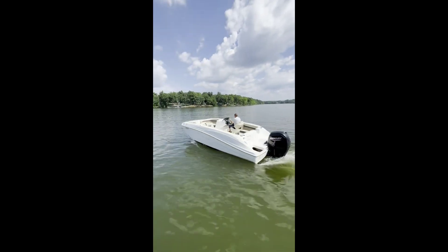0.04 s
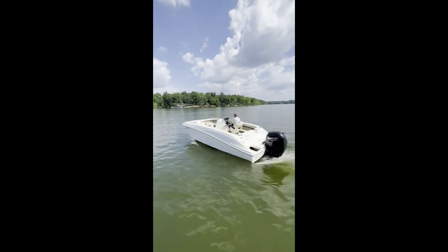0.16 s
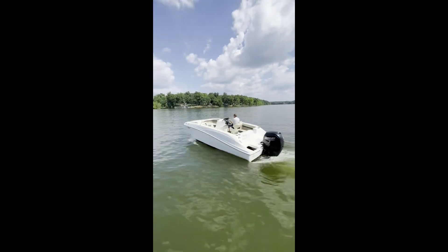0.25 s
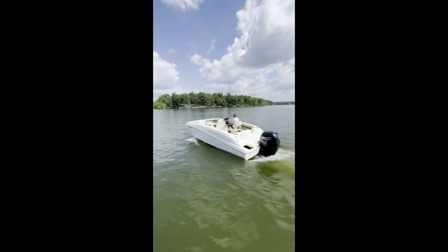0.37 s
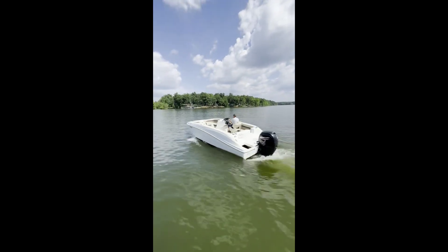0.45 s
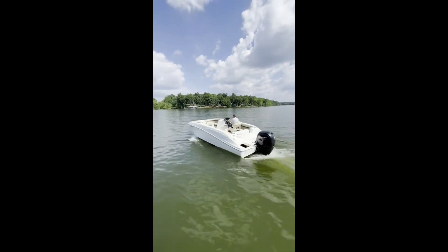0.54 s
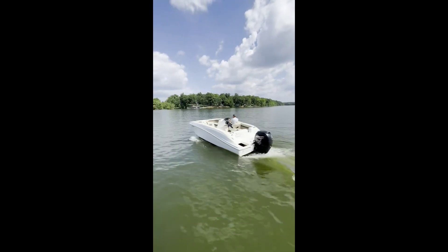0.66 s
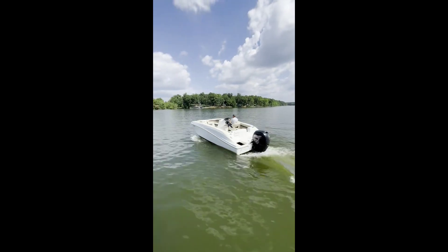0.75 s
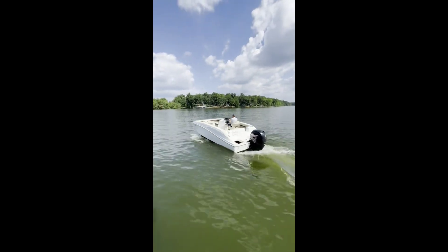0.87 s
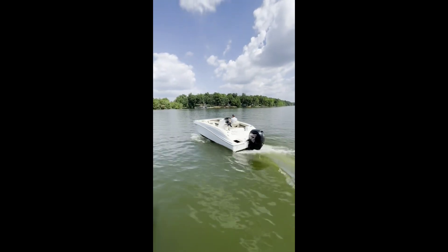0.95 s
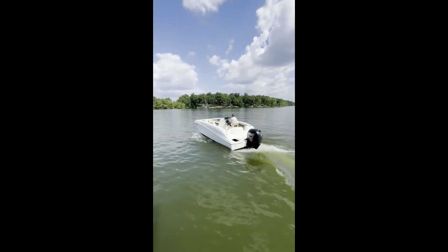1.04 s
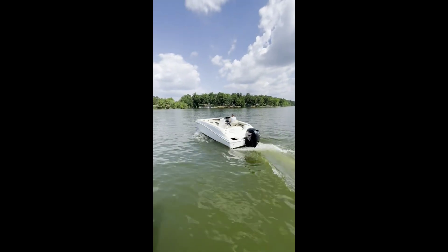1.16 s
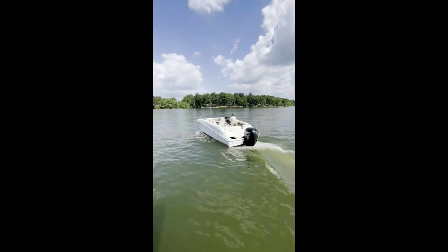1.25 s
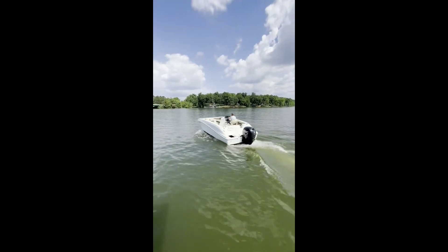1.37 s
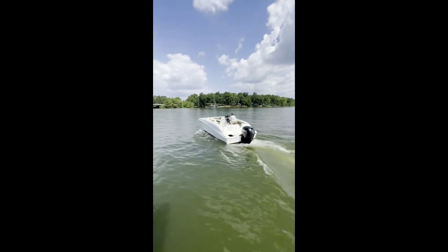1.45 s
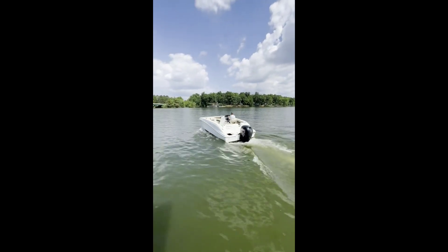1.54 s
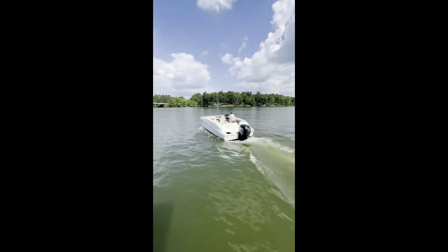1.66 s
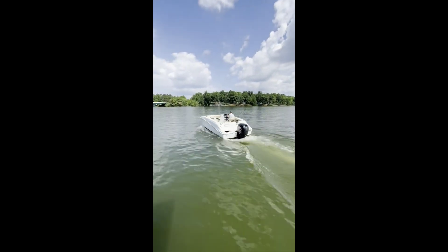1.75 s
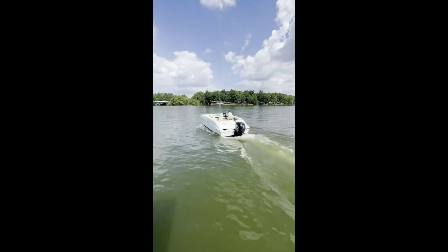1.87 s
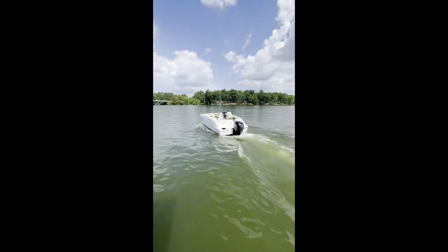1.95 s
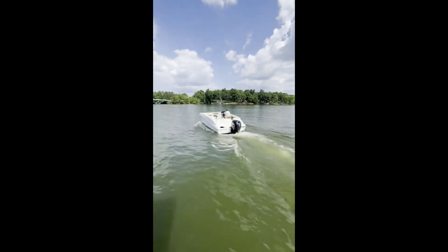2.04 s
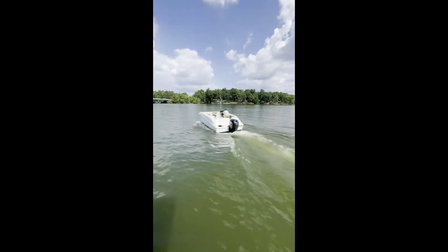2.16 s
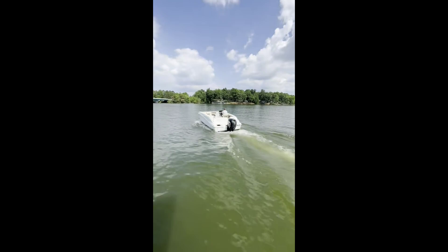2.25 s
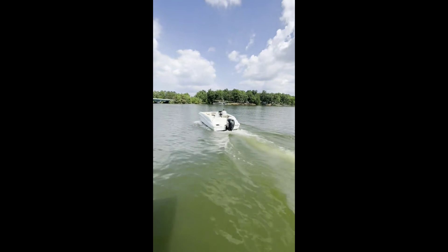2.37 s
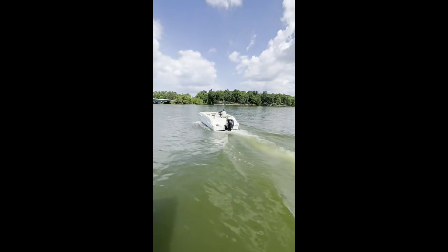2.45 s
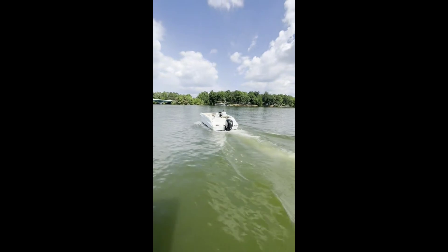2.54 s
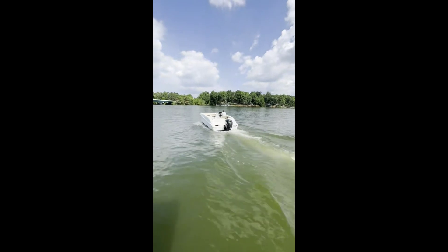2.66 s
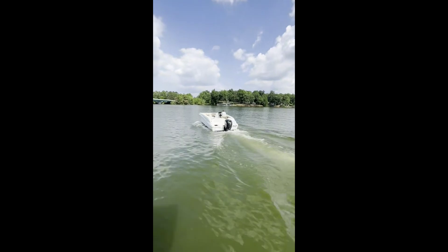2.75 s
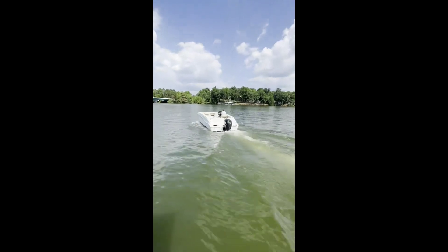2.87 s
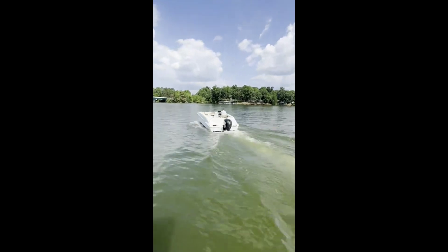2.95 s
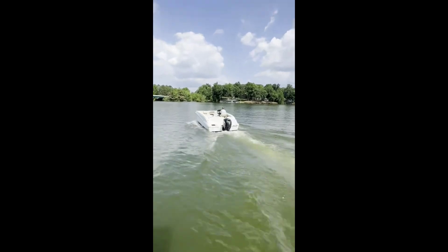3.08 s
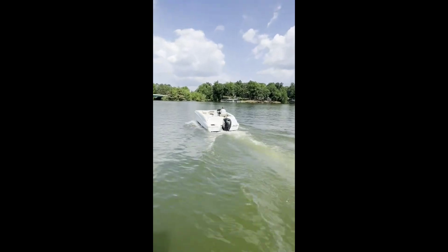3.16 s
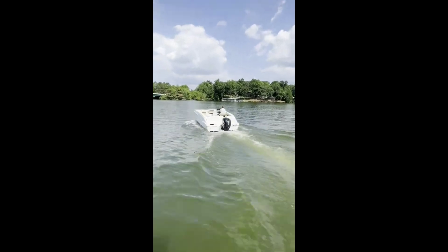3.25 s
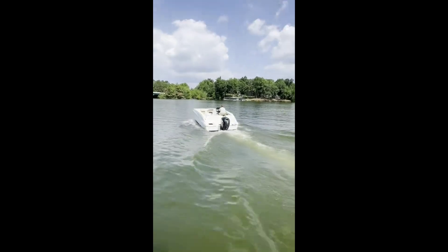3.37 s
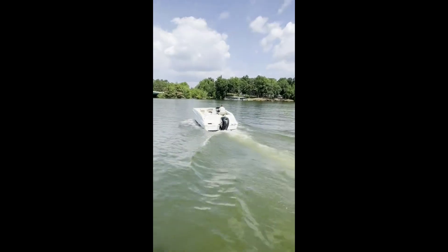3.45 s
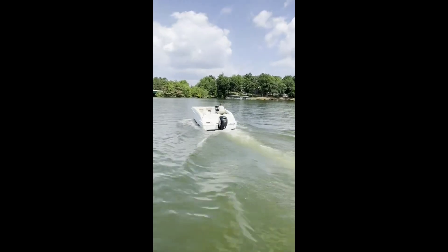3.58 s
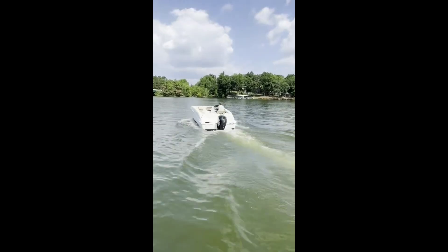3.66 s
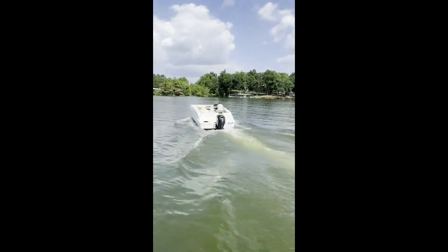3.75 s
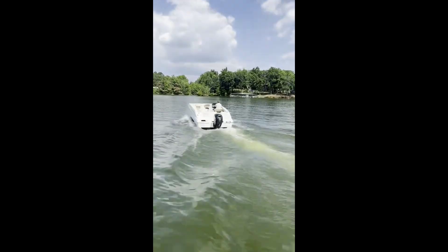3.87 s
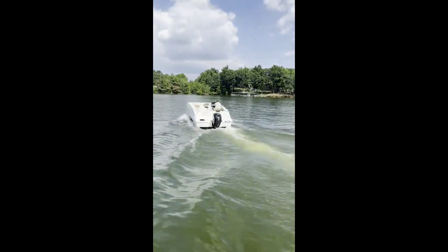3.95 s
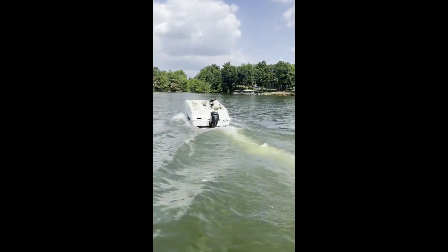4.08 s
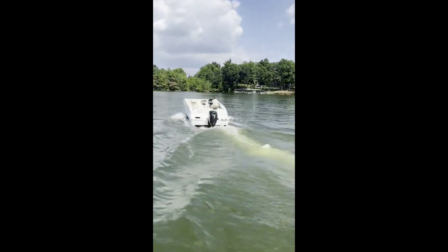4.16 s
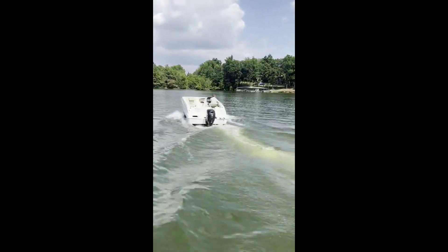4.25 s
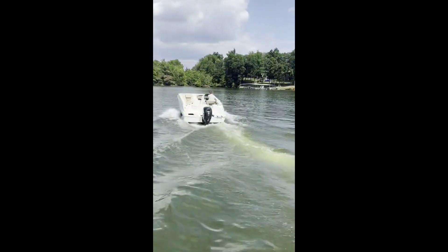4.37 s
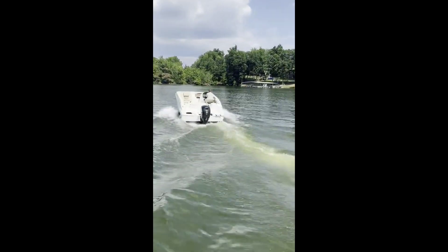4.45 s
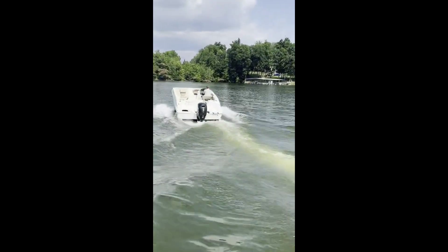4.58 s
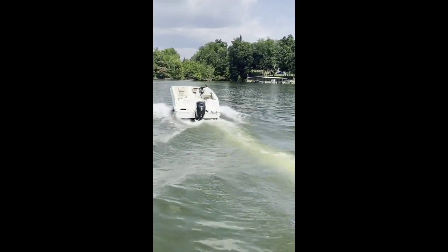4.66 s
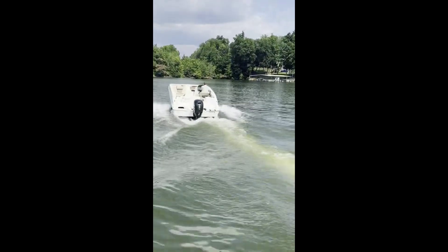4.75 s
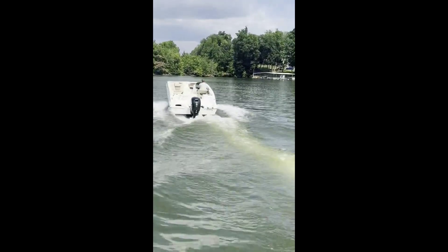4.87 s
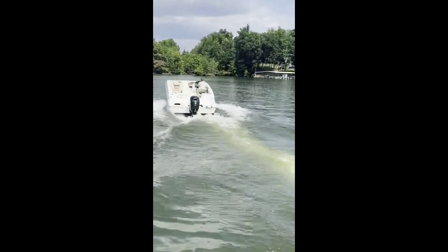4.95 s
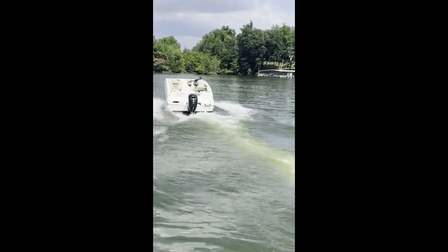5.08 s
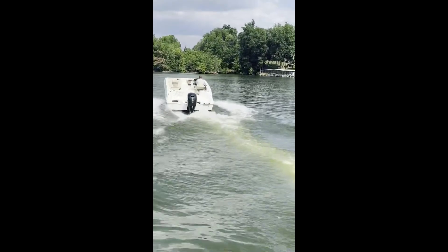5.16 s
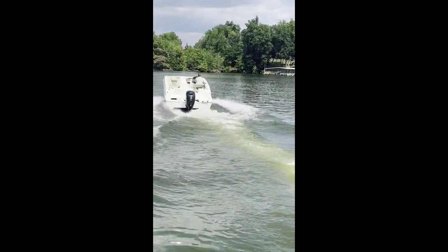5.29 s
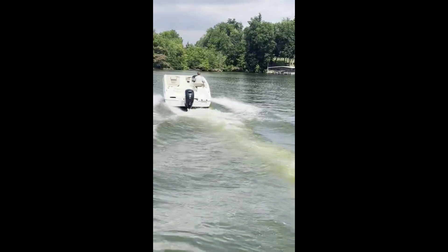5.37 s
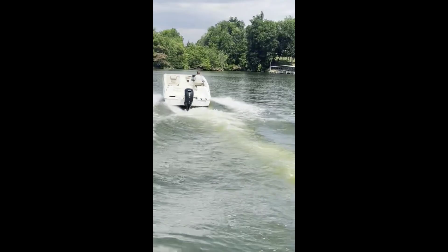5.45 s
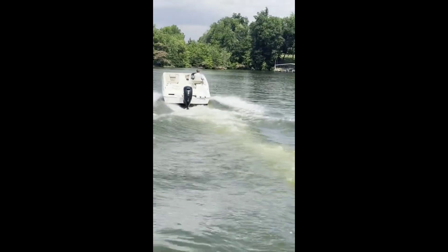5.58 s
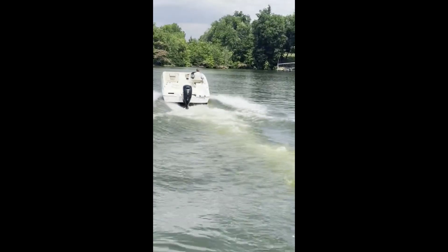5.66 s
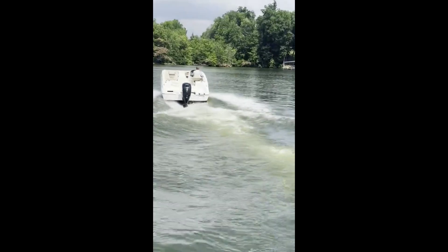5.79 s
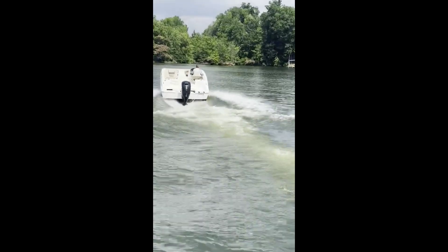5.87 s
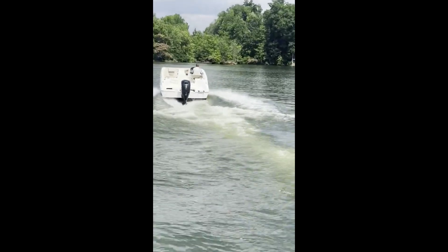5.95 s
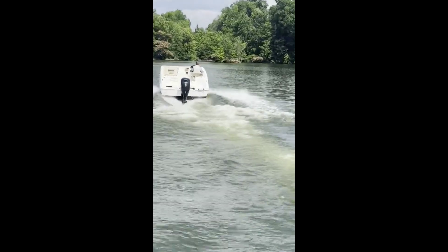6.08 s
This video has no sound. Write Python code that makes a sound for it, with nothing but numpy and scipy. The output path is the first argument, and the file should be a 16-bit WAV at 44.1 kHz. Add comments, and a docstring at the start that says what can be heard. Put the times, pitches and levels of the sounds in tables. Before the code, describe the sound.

On board a motor boat on a lake, the engine hums low, its exhaust burbling through churning water, while an outboard ahead drones with a faint whine. A few dry ticks sound close on the left. About halfway, the near engine opens up hard with a hoarse surge, then holds a higher, slowly climbing note. The two engines throb against each other over hissing spray.

```python
"""A motor boat's four-cylinder engine, heard on board, cruises and then opens up hard at about 3 s.
Its periodic firing gives harmonics that swell and dip as the revs climb, and pulses the gas that
burbles out through the water. An outboard ahead pulls away, slowly gaining speed, and the two
engine notes beat. Bubbles and drops churn and spray along the hulls on the lake, and the stereo
image narrows as the microphone zooms in."""
import sys
import numpy as np
from scipy import signal
from scipy.fft import rfft, irfft, next_fast_len
from scipy.io import wavfile

SR = 44100
rng = np.random.default_rng(int(sys.argv[2]) if len(sys.argv) > 2 else 0)


def master_out(mix):
    """Clip the mix to full scale and print it as 16-bit PCM to the path in sys.argv[1]."""
    frames = np.transpose(np.atleast_2d(mix))
    ceiling = np.clip(frames, -1, 1)
    pcm = np.round(ceiling * 32767).astype(np.int16)
    wavfile.write(sys.argv[1], SR, pcm)


N = 269892
TIME = np.arange(N) / SR
THROTTLE_S = 2.995   # the throttle opens
BITE_S, BITE_LENGTH_S = 3.28, .24   # the propeller bites
# cowling resonances: (frequency [Hz], width [Hz], gain [dB])
COWL_MODES = [(685.5, 56, 5.5), (783, 59, 6.5)]
COWL_HZ = COWL_MODES[0][0]


def from_db(db):
    return 10 ** (np.asarray(db) / 20)


def unit_rms(x):
    return x / np.sqrt(np.mean(x ** 2) + 1e-20)


def ramp(start_s, length_s):
    return np.clip((TIME - start_s) / length_s, 0, 1)


def bell(x, centre, width):
    return np.exp(-((x - centre) / width) ** 2)


def band(x, low, high):
    return signal.sosfilt(signal.butter(2, [low, high], "band", fs=SR, output="sos"), x)


def stereo(mid, side):
    return np.array([mid + side, mid - side])


def phase_of(hz):
    """Phase in radians is the time integral of angular frequency."""
    return 2 * np.pi * np.cumsum(hz) / SR


def in_time(rows):
    """Linear interpolation of each column at every sample."""
    times, *columns = np.transpose(rows)
    return [np.interp(TIME, times, column) for column in columns]


def at_hz(rows, hz):
    """Interpolation of each column over log frequency."""
    points, *columns = np.transpose(rows)
    return [np.interp(np.log(hz), np.log(points), column) for column in columns]


def drift(bandwidth_hz):
    """Low-passed noise: a slow random fluctuation of rms 1."""
    hop, settle = 40, 2000
    pole = np.exp(-2 * hop * np.pi * bandwidth_hz / SR)
    white = rng.standard_normal(N // hop + settle + 2)
    slow = signal.lfilter([1], [1, -2 * pole, pole * pole], white)[settle:]
    return np.interp(np.arange(N) / hop, np.arange(len(slow)), unit_rms(slow))


def coloured_noise(spectrum):
    """Third-octave noise bands weighted by a spectral density; rms 1."""
    low, high = spectrum[0][0], spectrum[-1][0]
    edges = np.geomspace(low, high, round(3 * np.log2(high / low)) + 1)
    white = rng.standard_normal((2, N))
    return unit_rms(sum(from_db(at_hz(spectrum, np.sqrt(a * b))[0]) * band(white[k % 2], a, b)
                        for k, (a, b) in enumerate(zip(edges, edges[1:]))))


def narrow_noise(hz, width_hz):
    """A resonance driven by noise gives a tone of random amplitude and phase; rms 1."""
    phase = phase_of(hz * np.ones(N))
    return unit_rms(drift(width_hz) * np.cos(phase) + drift(width_hz) * np.sin(phase))


def port_wind(level_db=-49):
    """Turbulent wind pressure rumbles independently on each microphone port."""
    return from_db(level_db) * np.array([unit_rms(band(rng.standard_normal(N), 25, 140))
                                         for port in range(2)])


def droplets(per_s, size_spread_db):
    """Shot noise: bubbles and drops of uneven size burst at random over a smooth hiss; rms 1."""
    sizes = from_db(size_spread_db * np.minimum(rng.exponential(1, N), 5)) * rng.choice([-1, 1], N)
    impulses = unit_rms(sizes * (rng.random(N) < per_s / SR))
    return unit_rms(impulses + 1.09 * rng.standard_normal(N))


def froth(level_db=-48.5, loss_db_per_s=2.0, band_hz=(5550, 6380)):
    """The finest bubbles resonate in a narrow high band, fading as the outboard leaves."""
    sizzle = unit_rms(band(droplets(per_s=2500, size_spread_db=5.0), *band_hz))
    return from_db(level_db - loss_db_per_s * TIME) * sizzle


def wake_trough(zoom, level_db=-47):
    """Tumbling water excites a hollow resonance of the wake, lost as the microphone zooms in."""
    return from_db(level_db) * (1 - zoom) * narrow_noise(1320, width_hz=72)


def side_wave(zoom, level_db=-32, start_below_db=14, build_s=0.43, lag_s=0.000544, right_db=-8.5):
    """Time and level differences place a building wave on the left; the zoom shuts it out."""
    # wave peeling off the hull: (frequency [Hz], relative density [dB])
    spectrum = [(350, 4), (480, 2), (680, 7.5), (1000, -4), (1450, -11.5), (2500, -11.5), (4500, -16),
                (6500, -28)]
    envelope = from_db(level_db - start_below_db * np.exp(-TIME / build_s)) * np.sqrt(1 - zoom)
    left = envelope * coloured_noise(spectrum)
    right = from_db(right_db) * np.interp(TIME - lag_s, TIME, left)
    return np.array([left, right])


def water(load, strain, zoom, patchy_db=1.42, air_db_per_octave=-8.0):
    """Shot noise of bubbles and drops: close propeller wash gives way to spray at speed."""
    # water noise: (frequency [Hz], relative wash density [dB], relative spray density [dB],
    # side re mid when wide [dB], side re mid when zoomed [dB])
    spectrum = [(398, -5, -2, -3, -12), (483, -2.5, -5, -13.5, -12), (622, 0.5, -2, -25, -29),
                (956, -7.5, -10.5, -5, 0), (1210, -9.5, -8, -12, -40), (1980, -11, -13.5, -6.5, -54),
                (2550, -17, -16.5, 2.5, -58), (3420, -19, -20, -2, -42), (4720, -23.5, -23.5, 6, -50),
                (5660, -22, -27, -3, -11), (7500, -23.8, -23.2, -5.5, -10),
                (8900, -20.5, -23, -11.5, -14.5)]
    # churn, splash and fizz: (initial wash [dB], wash loss [dB/s], spray [dB], spray gain at strain [dB])
    parts = [(-30, 1.88, -33.5, 1), (-39, 2.14, -42, -6.5), (-40, 3, -45.5, -3.5)]
    # the wake breaks: (time [s], width [s], churn gain [dB], splash gain [dB], fizz gain [dB])
    surges = [(.75, .35, 1.5, 1, .5), (2.2, .35, 0, 1.5, .5), (4.35, .3, 1, 2, 0)]
    at_speed = ramp(2, 3.8)
    drops = [[droplets(per_s=4500, size_spread_db=3.8) for channel in range(2)] for pair in range(2)]
    edges = np.geomspace(400, 16000, 23)
    crossovers_hz = [2000, 6500]   # churn | splash | fizz
    layers = np.zeros((3, 2, N))
    for k, (low, high) in enumerate(zip(edges, edges[1:])):
        hz = np.sqrt(low * high)
        wash_db, spray_db, wide_db, zoomed_db = at_hz(spectrum, hz)
        rolloff_db = air_db_per_octave * max(0, np.log2(hz / 9000))
        gain = from_db(wash_db + at_speed * (spray_db - wash_db) + rolloff_db + patchy_db * drift(14.7))
        width = from_db(wide_db + zoom * (zoomed_db - wide_db))
        mid, side = band(drops[k % 2], low, high)   # neighbouring bands get unrelated drops
        layers[np.searchsorted(crossovers_hz, hz)] += gain * stereo(mid, width * side)
    out = 0
    for k, (wash_db, loss_db_per_s, spray_db, strain_db) in enumerate(parts):
        wash = from_db(wash_db - loss_db_per_s * TIME)
        spray = load * from_db(spray_db + strain_db * strain)
        surge_db = sum(gains_db[k] * bell(TIME, time_s, width_s) for time_s, width_s, *gains_db in surges)
        layer = layers[k] / np.std(layers[k].mean(axis=0))
        out += np.hypot(wash, spray) * from_db(surge_db) * layer   # incoherent sources add in power
    return out


def hull(load, strain, hum_hz=77.9, hum_db=-36, rumble_db=-35):
    """Forced vibration: the hull rumbles under the waves and hums when driven hard."""
    # hull rumble: (frequency [Hz], relative density [dB])
    spectrum = [(22, -36), (32, -35), (45, -2.5), (60, -2), (80, 2), (110, -21), (160, 9.5)]
    planing, in_wash = bell(TIME, 4.8, 0.41), bell(TIME, .9, .55)
    level_db = hum_db + 2.5 * strain + 5 * planing + 1.5 * drift(7.2)
    hum = load * from_db(level_db) * np.sqrt(2) * np.sin(phase_of(hum_hz + drift(3.8)))
    rumble = from_db(rumble_db - 2.5 * load + 4 * in_wash) * coloured_noise(spectrum)
    return hum + rumble


def knocks(decay_s=.0012, band_ratio=1.3, right_db=-7):
    """Heavily damped impacts give dry ticks, close by on the left."""
    # knocks on board: (time [s], peak level [dB], frequency [Hz])
    impacts = [(2.047, -22, 1100), (2.134, -14.3, 1150), (2.134, -25.5, 6800), (2.155, -26.5, 5600)]
    out = np.zeros(N)
    for time_s, peak_db, hz in impacts:
        burst = rng.standard_normal(N) * (TIME >= time_s) * np.exp(-np.abs(TIME - time_s) / decay_s)
        tick = band(burst + 1e-18, hz / band_ratio, hz * band_ratio)
        out += from_db(peak_db) * tick / np.abs(tick).max()
    return out * from_db([[0], [right_db]])


def gear_whine(skirt_width_hz=55, skirt_db=-6.5, fade_s=0.09):
    """Narrow-band whining tones come and go, gliding slowly in pitch."""
    # spells of whine: (start [s], end [s], start pitch [Hz], end pitch [Hz], width [Hz], level [dB])
    spells = [(0, .34, 1295, 1285, 14, -43), (.15, .55, 2210, 2210, 12, -51),
              (.25, 1.0, 1870, 1854, 12, -48), (0.597, 1.65, 2253, 2240, 4, -51),
              (3.45, 4.42, 2620, 2760, 28, -49), (4.331, 4.86, 2810, 2865, 20, -51),
              (4.84, 5.26, 2785, 2860, 20, -46), (5.2, 5.78, 2764, 2850, 20, -50.5)]
    out = 0
    for start, end, start_hz, end_hz, width_hz, db in spells:
        hz = start_hz + (end_hz - start_hz) * ramp(start, end - start)
        tone = unit_rms(narrow_noise(hz, width_hz) + from_db(skirt_db) * narrow_noise(hz, skirt_width_hz))
        envelope = ramp(start, fade_s) * (1 - ramp(end - fade_s, fade_s))
        out += from_db(db) * envelope * tone
    return out


def outboard(near_firing, load, note_db=-38.0, in_phase_s=5.31):
    """Beats: the firing note of the outboard ahead interferes with that of the near engine."""
    # outboard speed: (time [s], firing rate [Hz])
    speed = [(0, 124.7), (1.7, 122.2), (2.7, 126.8), (3.9, 126.5), (6.12, 139.1)]
    # outboard harmonics: (order [multiple of cycle rate], level at speed [dB])
    harmonics = [(6, -46), (7, -42.5), (8, -37), (10, -40.5), (11, -41), (12, -45.5)]
    firing = phase_of(in_time(speed)[0])
    crest = int(in_phase_s * SR)
    firing = firing - firing[crest] + near_firing[crest]   # the two notes add up here
    cycle = firing / 4
    close_by, late_swell = bell(TIME, 0, 1.2), bell(TIME, 5.4, 1.16)   # it swells to its loudest late on
    level_db = note_db + 5 * close_by + 14 * late_swell + .8 * drift(6.6)
    overtones = sum(from_db(db + 1.5 * drift(3.9)) * np.cos(order * cycle + rng.uniform(0, 2 * np.pi))
                    for order, db in harmonics)
    return np.sqrt(2) * (load * overtones - from_db(level_db) * np.sin(firing))


def throttle(surge_s=.292, full_hz=116.1, creep_hz_per_s=5.75, lift_s=3.87, ease_s=0.53):
    """Load, strain (both 0-1) and firing rate: the engine surges, then labours until the hull lifts."""
    # near engine cruising: (time [s], firing rate [Hz])
    cruise = [(0, 66.9), (.2, 65.3), (1.5, 65.1), (2.5, 66.6)]
    load = 1 - bell(np.maximum(TIME, THROTTLE_S), THROTTLE_S, surge_s)
    strain = load * bell(np.maximum(TIME, lift_s), lift_s, ease_s)
    open_hz = full_hz + creep_hz_per_s * (TIME - THROTTLE_S)   # creeps up as the boat gathers way
    return load, strain, (1 - load) * in_time(cruise)[0] + load * open_hz


def panels(load, rasp_db):
    """Under load the rasp drives the engine cover's panels into resonance."""
    # panel modes: (frequency [Hz], width [Hz], level re rasp [dB])
    modes = [(1367, 64, -6), (1810, 35, -5), (2710, 45, -14.5), (3210, 71, -13)]
    ringing = sum(from_db(db) * narrow_noise(hz, width_hz) for hz, width_hz, db in modes)
    return from_db(rasp_db) * load ** 2 * ringing


def cowl_drone(load, drone_db=-43):
    """Engine noise excites the lowest cowling resonance at any speed, most as the throttle opens."""
    level_db = drone_db - 0.5 * load + 5.5 * bell(TIME, THROTTLE_S, .55)
    return from_db(level_db) * narrow_noise(COWL_HZ, width_hz=50)


def pipe_boom(load, strain, pipe_hz=110.9, strain_db=-31, running_db=-42):
    """Once the propeller bites, gas bursts sustain the lowest resonance of the exhaust pipe."""
    envelope = ramp(BITE_S, BITE_LENGTH_S) * (strain * from_db(strain_db) + load * from_db(running_db))
    return envelope * narrow_noise(pipe_hz, width_hz=6)


def cough(firing, level_db=-26.5, puff_depth=0.6, lope_depth=.35):
    """As the revs climb, hoarse gas noise is amplitude-modulated at the firing and cycle rates."""
    # rush of gas: (frequency [Hz], relative density [dB])
    spectrum = [(210, -15), (270, 1.5), (340, -1), (410, -14)]
    puffs = (1 + puff_depth * np.cos(firing)) * (1 + lope_depth * np.cos(firing / 4))
    return from_db(level_db) * bell(TIME, 3.55, 0.4) * unit_rms(coloured_noise(spectrum) * puffs)


def exhaust_levels(load, strain):
    """Gains of burble and rasp in dB: both rise with the strain on the engine."""
    cruise_db = -31 - 1.5 * np.minimum(TIME, THROTTLE_S)
    surge_db = 4 * np.sin(np.pi * load)   # more gas while the revs climb
    burble_db = cruise_db + 2.6 * load + 2.2 * np.sqrt(strain) + surge_db
    rasp_db = -42 - 20 * load + 22 * strain
    return burble_db, rasp_db


def exhaust(firing, burble_db, rasp_db, puff_depth=0.18, rasp_depth=0.66):
    """Modulated noise: gas bursts through the water at each firing, and the block rasps in step."""
    # gas in water: (frequency [Hz], relative density [dB])
    burble_spectrum = [(100, 7), (140, -0.5), (200, 4.5), (260, 2.5), (330, 2), (390, -3.5), (460, -27)]
    # engine block: (frequency [Hz], relative density [dB])
    rasp_spectrum = [(450, 4), (680, 13), (950, 1), (1300, 16), (1850, -19), (2500, -40), (3400, -41.5)]
    burble = stereo(coloured_noise(burble_spectrum), from_db(-26) * coloured_noise(burble_spectrum))
    puffs = band(burble * unit_rms(1 + puff_depth * np.cos(firing)), 70, 900)
    rasp = stereo(coloured_noise(rasp_spectrum), from_db(-18) * coloured_noise(rasp_spectrum))
    rasp *= unit_rms(1 + rasp_depth * np.cos(firing))
    return from_db(burble_db) * puffs + from_db(rasp_db) * rasp


def swell_and_dip_db(order, cycle_hz):
    """Pitch-dependent gain: a harmonic swells and dips at its own pitches as the revs climb."""
    # swells and dips: (order [multiple of cycle rate], frequency [Hz], width [Hz], gain [dB])
    gains = [(4, 81, 8.9, 12.5), (4, 99.7, 13.5, 12.5), (4, 121, 1.57, -12), (6, 179.5, 2.5, 5.5),
             (6, 187, 2.7, 6.5), (7, 234, 3.7, -6.5), (8, 203.5, 13, 13), (8, 224, 5, -11),
             (8, 253.8, 11.5, 14.5), (9, 266, 18, 4), (9, 285, 4, -3), (10, 301, 10, 14),
             (10, 316.5, 3.6, -13), (10, 334, 14.4, 8), (11, 326, 11, 3), (11, 349.5, 4.2, -12),
             (11, 367, 3.9, -13), (12, 323, 14, 9), (12, 370, 25, 13), (14, 442, 6.6, 18),
             (15, 442, 13, -9), (16, 499, 8, 8), (18, 540, 7, 8), (18, 560, 5, 12), (24, 757, 13, 8),
             (28, 922, 8, 11), (29, 906, 7, 9)]
    return sum(db * bell(order * cycle_hz, hz, width) for k, hz, width, db in gains if k == order)


def strong_harmonics(cycle_hz, load, full_note_db=-23, swell_order=12, waver_db=.7):
    """Periodic firing gives phase-locked harmonics; with four cylinders the firing note is order 4."""
    # firing note while cruising: (time [s], base level [dB])
    cruise_note = [(0, -18.5), (.3, -23), (.42, -20.5), (.55, -27), (.65, -22), (.89, -24.5), (.95, -36),
                   (1.02, -26.5), (1.14, -23), (1.24, -32), (1.27, -40), (1.75, -26), (1.93, -25),
                   (2.02, -35), (2.45, -26), (2.85, -32), (3.05, -33.5)]
    # strong harmonics: (order [multiple of cycle rate], cruising base [dB], full-throttle base [dB])
    harmonics = [(8, -30, -35.5), (10, -46, -37.5), (12, -38, -42), (14, -53, -48)]
    firing_note = (4, in_time(cruise_note)[0], full_note_db)
    cycle = phase_of(cycle_hz)
    out = 0
    for order, cruise_db, full_db in [firing_note, *harmonics]:
        level_db = cruise_db + load * (full_db - cruise_db) + waver_db * drift(7.0)
        if order == swell_order:
            level_db += 13.5 * bell(TIME, 0.52, 0.35)
        out -= from_db(level_db + swell_and_dip_db(order, cycle_hz)) * np.sin(order * cycle)
    return np.sqrt(2) * out


def weak_harmonics(cycle_hz, load, strain, waver_db=1.4, slip_rad=.45):
    """Unequal cylinders add harmonics, which uneven combustion modulates in level and phase."""
    # weak harmonics: (order [multiple of cycle rate], cruising base [dB], full-throttle base [dB])
    harmonics = [(3, -50, -38), (5, -49, -35), (6, -60, -38.5), (7, -38, -29.5), (9, -55, -32),
                 (11, -41, -30), (13, -44, -53), (15, -59, -41.5), (16, -62, -48), (17, -62, -40),
                 (18, -57, -53), (19, -50, -51), (20, -46, -65), (21, -54, -39), (22, -55, -49),
                 (24, -54.5, -49.5), (26, -47, -43.5), (28, -70, -51), (29, -71, -48.5)]
    cycle = phase_of(cycle_hz)
    bite = ramp(BITE_S, BITE_LENGTH_S)
    muffle_db = -6.5 - 8 * np.sin(np.pi * load)   # the upper orders are dullest in mid surge
    out = 0
    for order, cruise_db, full_db in harmonics:
        hz = order * cycle_hz
        level_db = cruise_db + bite * (full_db - cruise_db) + 2.5 * strain + waver_db * drift(2.4)
        level_db += swell_and_dip_db(order, cycle_hz)
        level_db += sum(db * bell(hz, centre, width) for centre, width, db in COWL_MODES)
        level_db += muffle_db * np.minimum(hz / COWL_HZ, 1) ** 2
        slip = slip_rad * (hz / COWL_HZ) ** 2 * drift(6.5)
        out += from_db(level_db) * np.cos(order * cycle + rng.uniform(0, 2 * np.pi) + slip)
    return np.sqrt(2) * out


def scene():
    """Superposition: both engines and the hull sit in the middle, the water all around."""
    load, strain, firing_hz = throttle()
    firing, cycle_hz = phase_of(firing_hz), firing_hz / 4
    zoom = ramp(3.82, 0.51)
    burble_db, rasp_db = exhaust_levels(load, strain)
    engine = strong_harmonics(cycle_hz, load) + weak_harmonics(cycle_hz, load, strain)
    gas = exhaust(firing, burble_db, rasp_db) + cough(firing) + pipe_boom(load, strain)
    cover = panels(load, rasp_db) + cowl_drone(load)
    ahead = outboard(firing, load) + gear_whine()
    lake = water(load, strain, zoom) + froth() + wake_trough(zoom) + side_wave(zoom) + port_wind()
    return lake + hull(load, strain) + knocks() + ahead + cover + gas + engine


def stereo_processing(sound):
    """The phone's stereo processing leans two narrow bands left; the left treble lags in phase."""
    # bands where mid leaks into side: (frequency [Hz], width [Hz], side re mid [dB])
    leaks = [(520, 110, -5.5), (1004, 100, -3.5)]
    # left channel behind right: (frequency [Hz], phase lag [rad])
    lag = [(5300, 0), (8000, 1.68), (10000, 2), (12000, 2), (15500, 5)]
    size = next_fast_len(N + SR // 10)
    hz = np.maximum(np.arange(size // 2 + 1) * SR / size, 1)
    left, right = rfft(sound, size)
    mid, side = (left + right) / 2, (left - right) / 2
    lean = sum(from_db(db) / (1 + 1j * (hz ** 2 - centre ** 2) / (hz * width))
               for centre, width, db in leaks)
    phase_shift = np.exp(.5j * at_hz(lag, hz)[0] * np.array([[-1], [1]]))
    return irfft(stereo(mid, side + lean * mid) * phase_shift, size)[:, :N]


def record(dry, cutoff_hz=15800):
    """Stereo processing shapes the image, and a steep low-pass filter limits the bandwidth."""
    lowpass = signal.ellip(10, .1, 80, cutoff_hz, fs=SR, output="sos")
    return signal.sosfilt(lowpass, stereo_processing(dry))


dry = scene()
out = record(dry)
master_out(out)
```